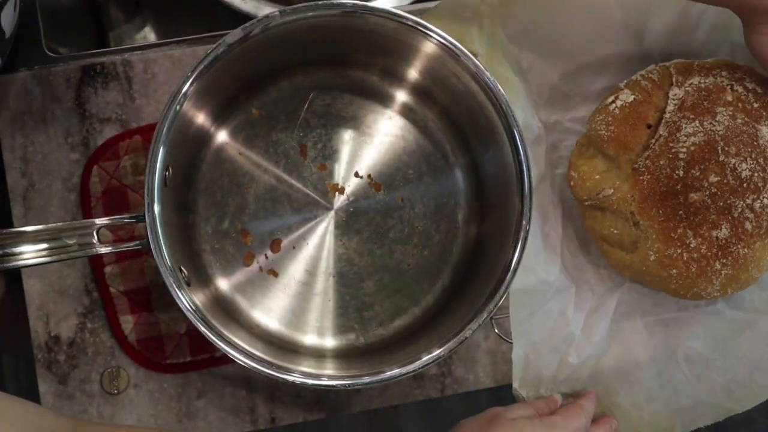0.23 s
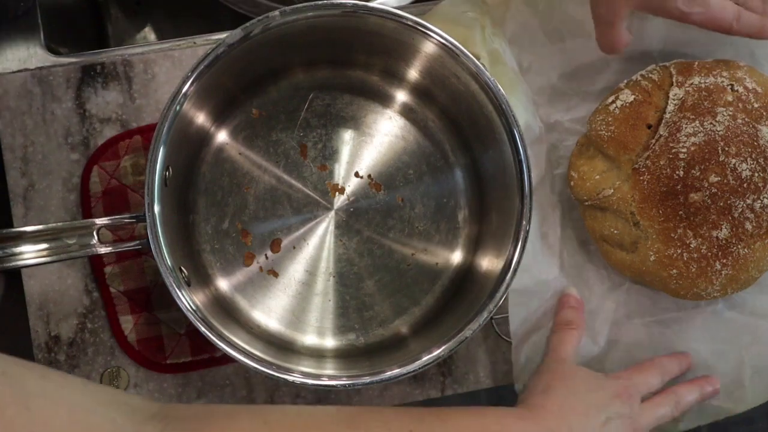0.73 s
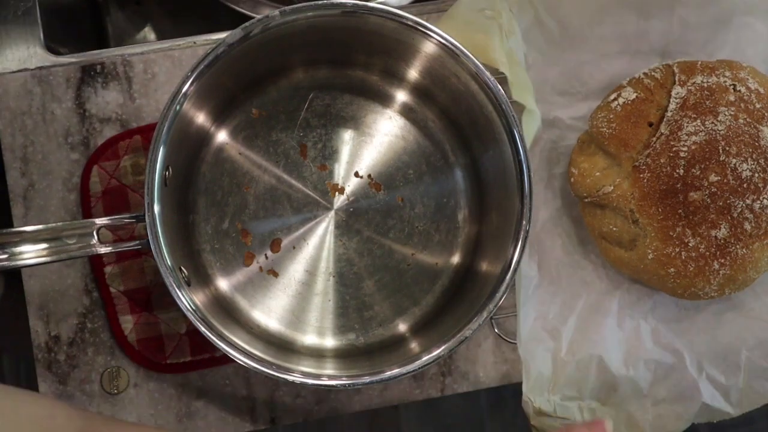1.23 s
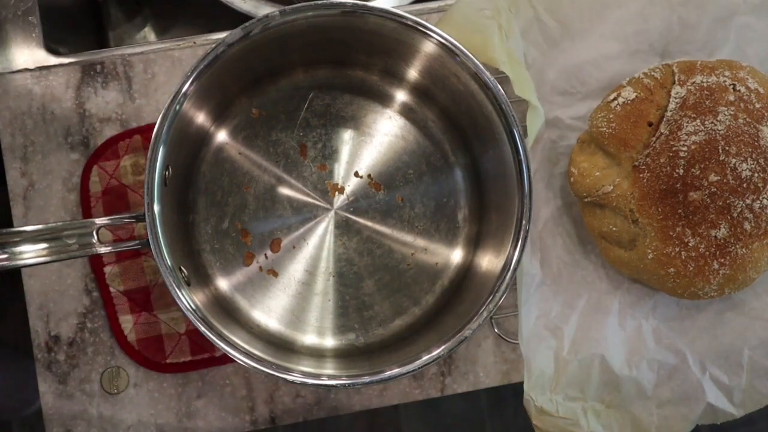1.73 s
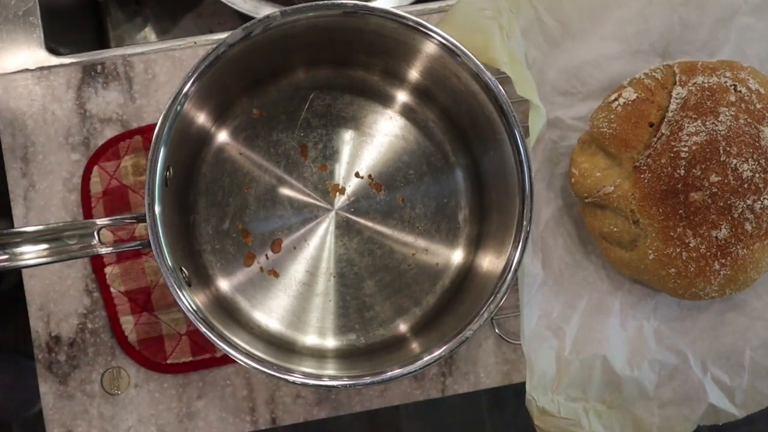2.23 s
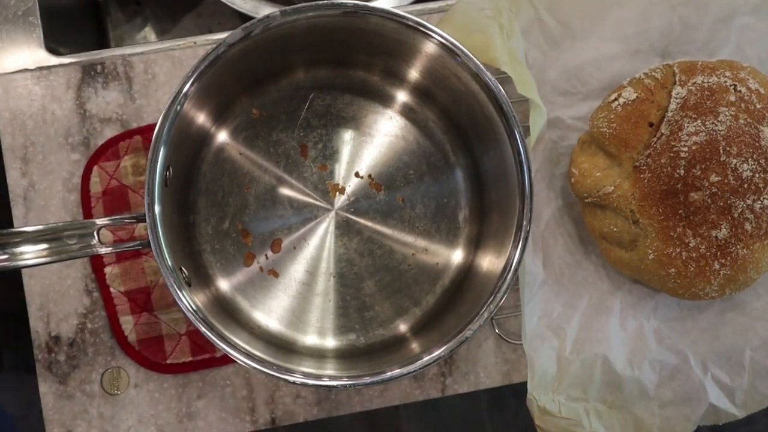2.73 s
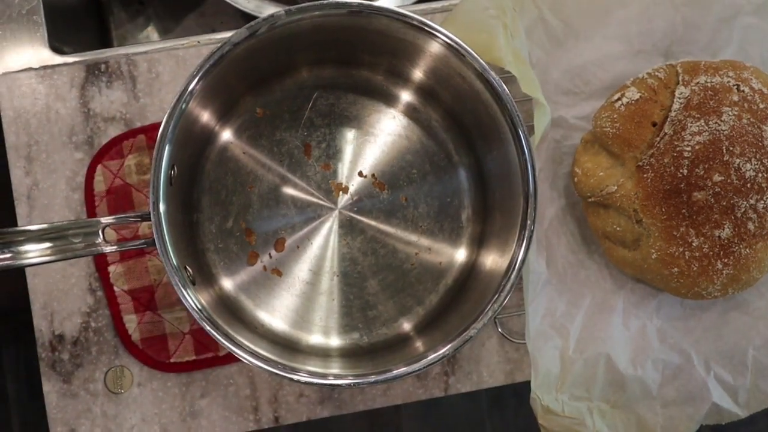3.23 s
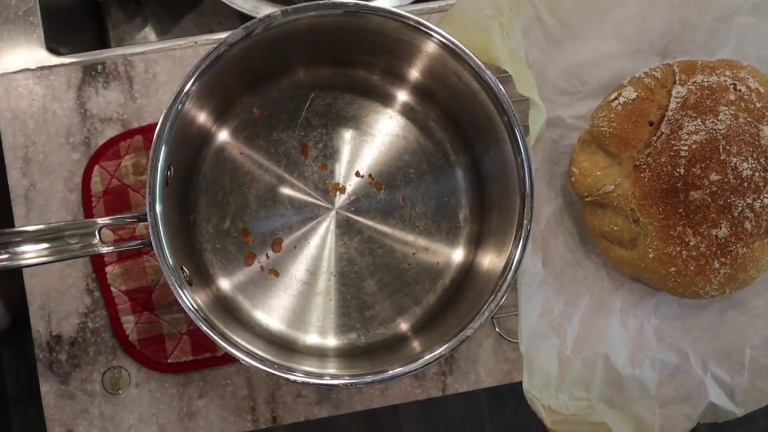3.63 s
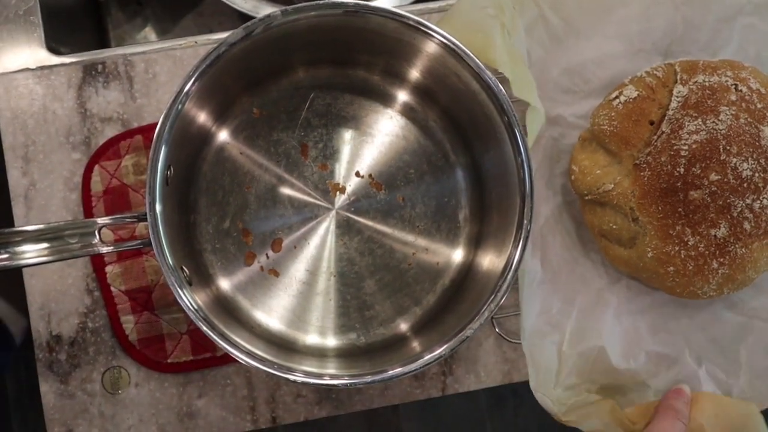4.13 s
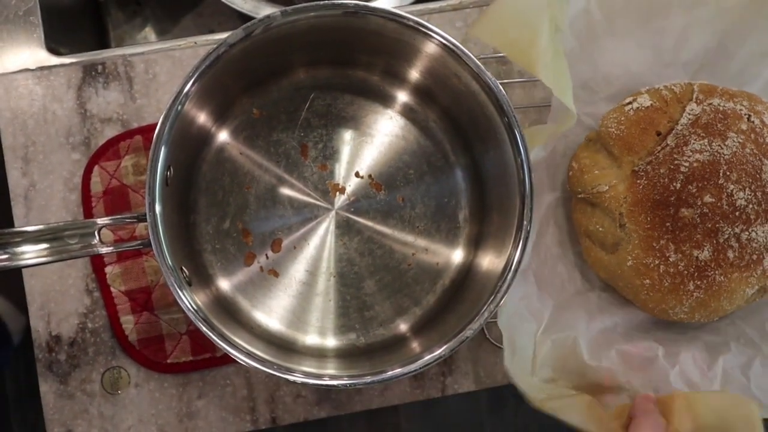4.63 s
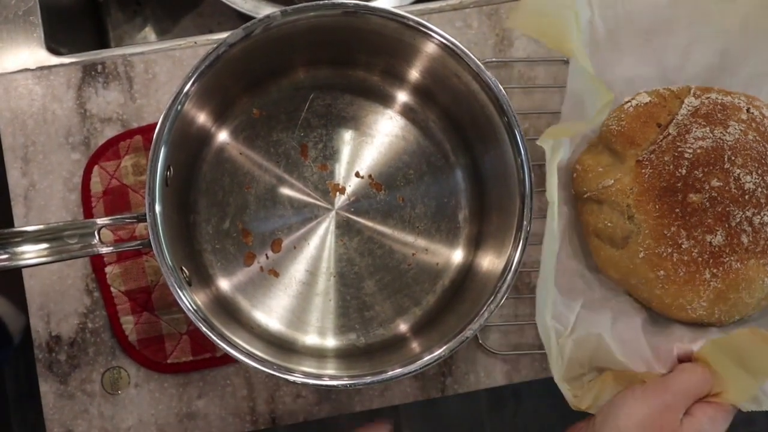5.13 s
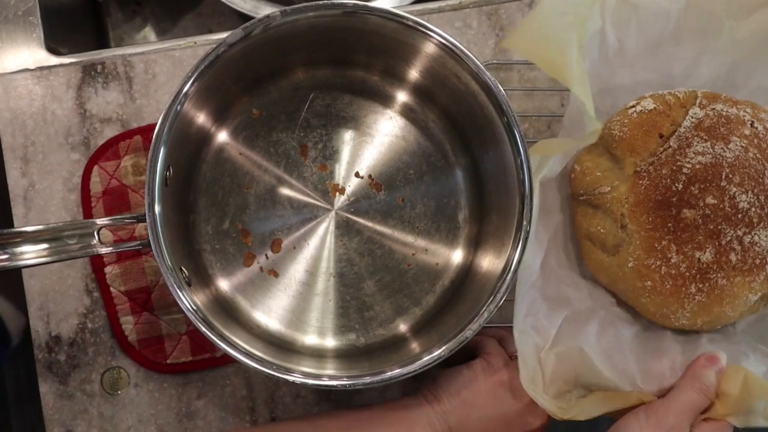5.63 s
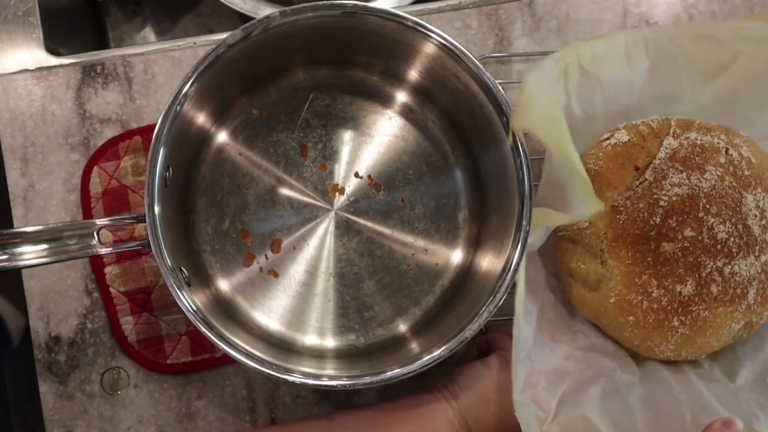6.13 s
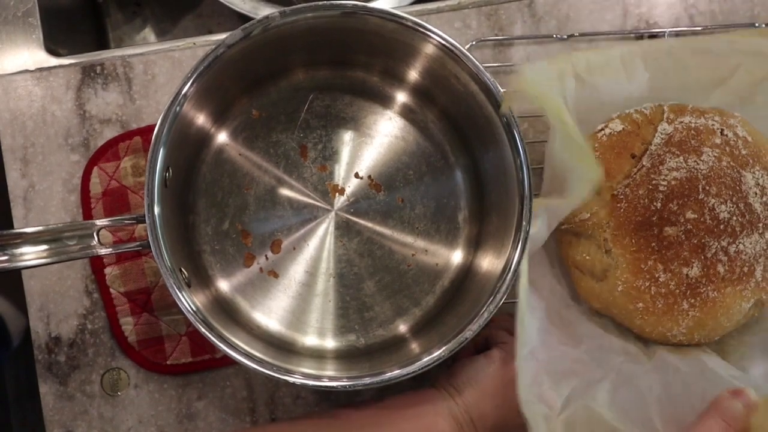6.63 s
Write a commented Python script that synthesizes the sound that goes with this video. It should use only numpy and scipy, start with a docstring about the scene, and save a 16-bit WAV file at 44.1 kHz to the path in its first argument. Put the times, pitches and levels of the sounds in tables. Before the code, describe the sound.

Close, dry stereo sound in a small kitchen, the paper leaning right, with a short bright room tail. From 0 to 1.35 s palms rub parchment: dense crisp crackle at first, with a faint dull knock at the very start, then weaker rustles, and stronger strokes around 0.85 to 1.05 s. From 1.4 to 2.3 s only lone dry ticks remain, with a barely audible settling rustle near 2.2 s. A low 120 Hz appliance hum with dark rushing air swells from 1.4 s and is loudest from 2.7 to 4 s. One hard tick lands at 2.8 s. Faint rustling starts at 3.4 s, growing from 3.9 s into vigorous short pulls, busiest 4.0 to 5.0 s, with sharp creases and hollow flapping. It thins around 5.2 to 5.7 s, then firmer crinkling resumes until 6.89 s, with a soft loaf knock at 6 s.

```python
"""Parchment paper on a wire rack

Small kitchen, two close microphone ports: hands rub, grip and drag a sheet of parchment with a loaf on it. The
sheet crackles in swarms of tiny filtered snaps, with single sharp creases, dry ticks, a soft noise hiss and a
hollow flapping; the loaf knocks the rack, a sum of decaying modes. Behind it an appliance hums in sines and
coloured noise; the background swells while the paper rests and drops at 4 s."""
import sys
import numpy as np
from scipy import signal
from scipy.fft import rfft, irfft
from scipy.io import wavfile
from scipy.ndimage import uniform_filter1d

SR = 44100
rng = np.random.default_rng(int(sys.argv[2]) if len(sys.argv) > 2 else 0)


def to_wav(sig):
    """Store sig (one row per channel, or 1-D mono) as 16-bit WAV at the path in sys.argv[1].

    Samples outside -1..1 are clipped; the rate is SR.
    """
    pcm = np.clip(np.atleast_2d(sig), -1, 1) * 32767
    pcm = np.round(pcm).astype(np.int16)
    wavfile.write(sys.argv[1], SR, pcm.T)  # frames by channels


N = 303849
T = np.arange(N) / SR
FREQS = np.fft.rfftfreq(N, 1 / SR)


def undb(db):
    """Decibels to gain."""
    return np.exp(np.asarray(db) * (np.log(10) / 20))


def unit(x):
    """Scale to rms 1."""
    return x / np.sqrt(np.mean(x ** 2))


def across(points):
    """Join a table's points over log frequency, one value per FFT bin."""
    hz, value = np.transpose(points)
    return np.interp(np.log(FREQS + 1), np.log(hz), value)


def colour(x, points):
    """Causal minimum-phase filter with the given spectrum and unit power gain."""
    log_gain = np.log(unit(undb(across(points))))
    cepstrum = irfft(log_gain, N)
    # folding the cepstrum onto positive time makes the filter causal
    folded = 2 * cepstrum * (np.arange(N) < N // 2)
    response = np.exp(rfft(folded) - cepstrum[0])
    return irfft(rfft(x) * response, N)


def add(track, s, sound):
    """Mix a short sound in at time s."""
    i = max(int(s * SR), 0)
    track[..., i:i + sound.shape[-1]] += sound[..., :N - i]


def walk(rate):
    """Random levels held 1 / rate s and slewed, with rms 1."""
    hold = int(SR / rate)
    steps = rng.standard_normal(N // 32)[np.arange(N) // hold]
    return unit(uniform_filter1d(steps, hold))


# width of diffuse sound at the two ports: pitch_hz, side_minus_mid_db
DIFFUSE_WIDTH = [(110, -22), (200, -18), (380, -11), (700, -8), (1300, -1), (2400, 1), (5000, 2),
                 (14000, 7)]


def diffuse(pair):
    """Mid and side signals become left and right: alike in the bass, wide in the treble."""
    width = undb(across(DIFFUSE_WIDTH))
    gains = np.array([np.ones_like(width), width]) / np.hypot(1, width)
    mid, side = irfft(rfft(pair) * gains, N)
    return np.array([mid + side, mid - side])


# mains hum: pitch_hz, relative_level_db
MAINS_HUM = [(120, 0), (180, -53), (240, -17), (360, -24)]
# faint wavering whines: mean_pitch_hz, relative_level_db before stereo placing
APPLIANCE_WHINES = [(407, -33.5), (459, -29.5), (798, -35.5), (4650, -47)]
# colour of the rushing air: pitch_hz, relative_level_db
AIR_COLOUR = [(20, 10), (35, -7.5), (80, 5), (140, 7.5), (190, -0.5), (235, 3), (300, -6), (460, -8),
              (1000, -12.5), (2000, -19), (5000, -31), (7000, -34.5), (10500, -35), (15000, -65)]
# gain of the whole background over time: time_s, level_db
BACKGROUND_LEVEL = [(0, -27.5), (1.35, -28), (2.7, -20), (4.0, -19), (4.04, -25.5), (4.35, -26.5),
                    (5.1, -32), (5.9, -27.5), (6.89, -27.5)]
# low drone: starting pitch and its steady fall
DRONE_HZ, DRONE_SAG_HZ_PER_S = 59.5, 2.1
# it swells once and fades; peak level relative to the 120 Hz hum, same slope either side
DRONE_PEAK_S, DRONE_DB, DRONE_FADE_DB_PER_S = 1.7, -12.5, 12


def appliance():
    """Mains hum and a sinking drone in the middle, whines and rushing air spread around, under one level curve."""
    hum = sum(undb(db) * np.sin(2 * np.pi * (hz * T + rng.random())) for hz, db in MAINS_HUM)
    drone_hz = DRONE_HZ - DRONE_SAG_HZ_PER_S * T
    drone_db = DRONE_DB - DRONE_FADE_DB_PER_S * np.abs(T - DRONE_PEAK_S)
    drone = undb(drone_db) * np.sin(2 * np.pi * np.cumsum(drone_hz) / SR)
    whine = np.zeros(N)
    for hz, db in APPLIANCE_WHINES:
        wavering_hz = hz + 12 * walk(85)
        whine += undb(db) * np.sin(2 * np.pi * np.cumsum(wavering_hz) / SR)
    air = colour(rng.standard_normal((2, N)), AIR_COLOUR) * undb(-11.0)
    tones = np.sqrt(2) * undb(-5.0) * (hum + drone)
    surround = diffuse(air + np.sqrt(2) * whine)
    level_db = np.interp(T, *np.transpose(BACKGROUND_LEVEL))
    return (tones + surround) * undb(level_db)


# ringing modes of the rack and the counter: pitch_hz, relative_level_db, t60_s
RACK_MODES = [(92, -2, 0.29), (164, 1.5, 0.1), (325, 2, 0.12), (402, 6, 0.091), (488, -10, 0.2)]
# the loaf nudges the rack: start_s, level_db
LOAF_NUDGES = [(0.031, -30.5), (5.988, -29.5)]


def rack():
    """Soft, dull knocks of the loaf: decaying sine modes with a rounded onset."""
    out, t = np.zeros(N), T[:SR // 3]
    knock = sum(undb(db - 60 * t / t60) * np.sin(2 * np.pi * hz * t) for hz, db, t60 in RACK_MODES)
    onset = 1 - np.exp(-t / 0.0024)
    for s, db in LOAF_NUDGES:
        add(out, s, undb(db) * knock * onset)
    return out


# the paper lies to the right, so the left port hears it later: pitch_hz, left_lag_radians
LEFT_LAG = [(100, 0), (700, .2), (1700, .6), (3000, 1.2), (4800, 2), (9000, 2.2), (12500, 3)]
# the sheet is wide, its ends lag more or less than its middle: pitch_hz, lag_either_way_radians
END_LAG = [(200, 0), (1800, .75), (5000, .65), (10000, .4)]
# level difference between the ports: pitch_hz, left_minus_right_db
PORT_BALANCE = [(200, 2.5), (500, -2), (1100, -2.5), (2200, -5), (4500, -2), (8000, -1.2), (12000, 0.5)]
ROOM_BUILD_S = .005  # the reflections take this long to gather


def kitchen(sound, room_db, t60, reach=1):
    """Direct sound leads at the right port; a short decaying noise tail stands for the room's reflections."""
    t = T[:SR // 3]
    tails = rng.standard_normal((2, len(sound), len(t)))
    tails *= undb(-60 * t / t60) * np.clip(t / ROOM_BUILD_S, 0, 1)
    tails /= np.linalg.norm(tails, axis=2, keepdims=True)
    # each part of the sheet (a row of the sound) stirs the room in its own way
    reflections = signal.oaconvolve(sound[None], tails, axes=2).sum(1)[:, :N]
    wet = diffuse(reflections)
    ports = np.array([[.5], [-.5]])
    lag, spread = across(LEFT_LAG), across(END_LAG)
    direct = 0
    for part, place in zip(sound, np.linspace(-reach, reach, len(sound))):
        direct = direct + rfft(part) * np.exp(-1j * ports * (lag + place * spread))
    both = direct + undb(room_db) * rfft(wet)
    return irfft(both * undb(ports * across(PORT_BALANCE)), N)


# snaps centred at either of these pitches click broadly; those between ring more narrowly,
# most of all near 1640 Hz; beyond them the click is broader still
HIGH_BROAD_HZ, LOW_BROAD_HZ, RING_POWER = 4500, 600, 1.5


def snaps(hz, flutter, flutter_s, travel_s, size=256):
    """Patches of paper flip, one row each: a sharp edge and a noise flutter in the patch's own resonance."""
    t, f = T[:size], np.fft.rfftfreq(size, 1 / SR) + 1
    centre = hz[:, None]
    shiver = rng.standard_normal((len(hz), size)) * np.exp(-t / flutter_s) / np.sqrt(flutter_s * SR / 2)
    # bending waves carry the treble faster than the lows; travel_s is the delay at the centre pitch
    edge = np.exp(-4j * np.pi * travel_s * np.sqrt(f * centre))
    ratio = f / centre
    sharpness = np.minimum(HIGH_BROAD_HZ / centre, centre / LOW_BROAD_HZ) ** RING_POWER
    resonance = 1 + 1j * sharpness * (ratio - 1 / ratio)
    rung = irfft((edge + flutter * rfft(shiver)) / resonance)
    return rung / np.linalg.norm(rung, axis=1, keepdims=True)


# lone dry ticks while the sheet rests: start_s, edge_level_db, ring_pitch_hz, ring_level_db
# (levels of unit-energy sounds before colouring)
RESTING_TICKS = [(1.4144, -16, 3000, -21), (1.4397, -6, 1580, -8.5), (1.568, -24.5, 2390, -19),
                 (1.5975, -6.5, 3300, -12.5), (1.679, -25, 2440, -21.5), (1.755, -20, 3860, -29),
                 (1.9622, -17.5, 4000, -36), (2.0165, -15.5, 3500, -20), (2.1358, -7.5, 1510, -27),
                 (2.2802, -8, 2620, -10), (2.807, 8, 1370, -8)]
# colour of the ticks: pitch_hz, relative_level_db
TICK_COLOUR = [(600, -22), (1300, -2), (2700, 0), (4300, 1.5), (6000, -1.5), (9800, 0), (11000, 4.5),
               (12200, -8), (16000, -20)]
# shiver strength against the edge and its decay time; decay time of the ring in cycles
TICK_SHIVER, TICK_SHIVER_S, TICK_RING_CYCLES = .45, .002, 1.2
# travel time of the edge through the sheet, at the pitch beside it
TICK_TRAVEL_S, TICK_TRAVEL_HZ = .0005, 4500


def ticks():
    """A clean, bright edge with a brief shiver, and a short sine ring of the patch that flipped."""
    out, t = np.zeros(N), T[:SR // 50]
    # bending waves bring the treble a moment before the lows
    f = np.fft.rfftfreq(len(t), 1 / SR)
    bend = irfft(np.exp(-4j * np.pi * TICK_TRAVEL_S * np.sqrt(f * TICK_TRAVEL_HZ)), len(t))
    fade = np.exp(-t / TICK_SHIVER_S) / np.sqrt(TICK_SHIVER_S * SR / 2)
    for s, db, hz, ring_db in RESTING_TICKS:
        edge = bend + TICK_SHIVER * rng.standard_normal(len(t)) * fade
        ring = np.sin(2 * np.pi * hz * t) * np.exp(-t * hz / TICK_RING_CYCLES)
        edge /= np.linalg.norm(edge)
        ring /= np.linalg.norm(ring)
        add(out, s, undb(db) * edge + undb(ring_db) * ring)
    return kitchen(colour(out, TICK_COLOUR)[None], room_db=-1, t60=0.23)


# single creases snapping through: start_s, relative_level_db, centre_pitch_hz
SINGLE_CREASES = [(0.0162, -17, 8300), (0.0346, -19.5, 8840), (0.0445, -22, 8060), (0.0984, -28, 7885),
                  (0.127, -15, 5500), (0.288, -16.5, 6530), (0.348, -25, 6500), (0.3949, -39, 7000),
                  (0.401, -27, 4530), (0.486, -31, 4510), (0.589, -26, 4540), (0.707, -37, 6530),
                  (0.7561, -32, 5030), (0.7795, -21.5, 5670), (0.8298, -18, 6700), (0.8551, -28, 5503),
                  (0.8757, -22, 4793), (0.919, -16.5, 4800), (1.005, -20, 4830), (1.029, -12.5, 4680),
                  (1.036, -11.5, 6377), (1.0813, -28, 7160), (1.1803, -28, 7164), (1.215, -22, 3307),
                  (1.244, -23, 4800), (1.249, -21, 7100), (1.2862, -30, 5700), (1.3254, -25, 4290),
                  (1.3414, -26.5, 7300), (3.4367, -36.5, 3620), (3.6428, -34, 8150), (3.65, -33, 6480),
                  (3.687, -43, 6000), (3.699, -34, 4214), (3.787, -39, 2810), (3.8102, -29, 6250),
                  (3.8578, -16.5, 5540), (3.8692, -29, 6390), (3.889, -14, 6480), (3.8971, -19, 5726),
                  (3.9586, -27, 6020), (3.9669, -20.5, 3750), (3.9975, -20, 6660), (4.0075, -11, 9100),
                  (4.0216, -17.5, 5400), (4.028, -12, 5890), (4.038, -22, 7600), (4.068, -9, 6830),
                  (4.0786, -15, 8870), (4.1257, -16, 6260), (4.2024, -19, 6610), (4.2803, -18, 6930),
                  (4.2908, -12.5, 5800), (4.301, -18, 5596), (4.3505, -13, 5480), (4.3878, -18, 5834),
                  (4.4201, -11.5, 6186), (4.4523, -25, 6120), (4.486, -20, 4440), (4.501, -14.5, 5054),
                  (4.509, -17.5, 4980), (4.52, -24, 6080), (4.5482, -21, 6100), (4.591, -23.5, 5120),
                  (4.63, -20, 7200), (4.6356, -19, 6120), (4.652, -17, 6510), (4.6609, -13, 6190),
                  (4.6834, -19, 7785), (4.7197, -12, 5535), (4.736, -17.5, 5450), (4.765, -26, 5616),
                  (4.777, -21, 3200), (4.7865, -14, 5300), (4.7981, -13, 6336), (4.8453, -12, 7060),
                  (4.8618, -24, 2631), (4.9254, -14.5, 6470), (5.0189, -19, 6127), (5.0263, -15.5, 6316),
                  (5.0712, -20, 5700), (5.1133, -22, 4630), (5.1309, -18.5, 4605), (5.1324, -25, 4857),
                  (5.1614, -21, 6640), (5.269, -32, 3780), (5.338, -30, 4840), (5.341, -37, 1520),
                  (5.385, -19, 5990), (5.4129, -21.5, 5730), (5.526, -21.5, 7800), (5.553, -24, 5370),
                  (5.5616, -28, 4970), (5.6178, -22.5, 4255), (5.6212, -24.5, 4170), (5.6338, -28.5, 3202),
                  (5.6605, -25.5, 3097), (5.7003, -23, 4676), (5.734, -27, 4186), (5.7731, -21.5, 4183),
                  (5.835, -28, 6196), (5.9549, -16, 6130), (5.9935, -18.5, 6360), (6.026, -22, 5395),
                  (6.1116, -24, 6000), (6.1893, -23.5, 3195), (6.2372, -24, 6830), (6.2627, -23, 5510),
                  (6.2982, -19.5, 4317), (6.4163, -22.5, 6206), (6.5507, -16.5, 6480), (6.6753, -22, 6770),
                  (6.7575, -16, 6310), (6.8273, -23, 3810)]
# colour of the creases: pitch_hz, relative_level_db
CREASE_COLOUR = [(300, -30), (800, 5), (1300, 6.5), (2200, 3), (4000, 5.5), (6000, 1.5), (10400, 9.5),
                 (12000, 6), (14000, -15), (16000, -51)]
# flutter of a fold as it gives way: strength against the first edge, decay time
CREASE_FLUTTER, CREASE_FLUTTER_S = 1.1, .0015
CREASE_REACH = .45  # the stiff folds lie near the middle: share of the sheet's width


def creases(channels=3):
    """Stiff folds give way one at a time, each a resonant snap at its own pitch and place on the sheet."""
    out = np.zeros((channels, N))
    times, levels, centres = np.transpose(SINGLE_CREASES)
    places = rng.integers(channels, size=len(times))
    folds = snaps(centres, flutter=CREASE_FLUTTER, flutter_s=CREASE_FLUTTER_S, travel_s=0.000391)
    for s, db, place, fold in zip(times, levels, places, folds):
        add(out[place], s, undb(db + 23.5) * fold)
    return kitchen(colour(out, CREASE_COLOUR), room_db=-2.0, t60=0.19, reach=CREASE_REACH)


def movement(start, length, attack_s, release_db_per_s):
    """Gain of one movement of the sheet: it builds up, holds, then dies away."""
    build = np.clip((T - start) / attack_s, 0, 1)
    since_end_s = np.clip(T - start - length, 0, 2)
    return build * undb(-release_db_per_s * since_end_s)


# flutter of the tiny snaps: strength against the edge, decay time
FACET_FLUTTER, FACET_FLUTTER_S = 1.2, .001
HARDEST_SNAP = 2.2  # the hardest snap lies at most this many spreads above the softest


def swarm(per_s, spread_db, bunching_db, low_hz, high_hz, count=20000, channels=4):
    """Facets buckle at random in little avalanches, mostly softly, now and then hard; one row a quarter sheet."""
    when, pitch, force, sign, place = rng.random((count, 5)).T
    # exponential waits against a wandering rate give the start samples
    due = np.cumsum(per_s * undb(bunching_db * walk(55))) / SR
    start = np.searchsorted(due, np.cumsum(-np.log(when)))
    hardness = np.minimum(-np.log(force), HARDEST_SNAP)
    size = undb(spread_db * hardness) * np.sign(sign - .5)
    hz = low_hz * (high_hz / low_hz) ** pitch[start < N]
    grains = snaps(hz, flutter=FACET_FLUTTER, flutter_s=FACET_FLUTTER_S, travel_s=0.000304)
    out = np.zeros((channels, N))
    for i, grain, gain, row in zip(start, grains, size, place * channels):
        add(out[int(row)], i / SR, gain * grain)
    # the hand feeds energy in steadily, however it is shared among the snaps
    power = uniform_filter1d(np.mean(out ** 2, 0), SR // 20)
    return out / np.sqrt(power + 1e-9)


# palms rub the sheet flat: start_s, length_s, crackle_level_db before the common trim
PALM_RUBS = [(0.0, 0.27, -16.5), (0.336, 0.11, -28), (0.437, 0.16, -23), (0.669, 0.097, -30),
             (0.783, 0.061, -25), (0.83, 0.12, -15), (0.991, .075, -16), (1.102, 0.07, -24.5),
             (1.213, 0.025, -21), (1.271, 0.081, -31)]
# fingers drag the loaf along in short pulls: start_s, length_s, crackle_level_db, flap_relative_db
# (both levels before the common trims)
EDGE_PULLS = [(3.408, 0.079, -40, -21), (3.5, 0.12, -43, -20), (3.635, 0.033, -33.5, -14),
              (3.68, .17, -36.5, -7), (3.886, 0.036, -28, -6.5), (3.954, 0.15, -24.5, -8.5),
              (4.094, 0.13, -19, -13.5), (4.244, .2, -22, -10), (4.486, 0.1, -26, -7.5),
              (4.625, 0.18, -17.5, -12), (4.832, 0.072, -24, -12.5), (4.905, 0.125, -18.5, -13),
              (5.045, 0.036, -29, -6.5), (5.124, 0.044, -28, -10), (5.192, 0.23, -35.5, -7.5),
              (5.416, 0.049, -25.5, -11.5), (5.528, 0.043, -29, -11.5), (5.619, 0.042, -28, -12),
              (5.698, 0.093, -28, -8), (5.792, .1, -20.5, -10.5), (5.941, 0.048, -19, -9.5),
              (6.022, 0.24, -26, -9), (6.078, 0.037, -21.5, -15), (6.216, 0.18, -25, -10.5),
              (6.384, 0.13, -24.5, -10), (6.542, 0.093, -21.5, -9.5), (6.663, 0.048, -19, -9.5),
              (6.723, 0.16, -21.5, -10)]
# the sheet glides instead of folding, with a finer grain: start_s, length_s
SHEET_GLIDES = [(3.4, .42), (5.79, 1.3)]
# colour of the crackle: pitch_hz, relative_level_db
CRACKLE_COLOUR = [(300, -69.5), (800, 0.5), (1500, -7), (2500, -0.5), (4200, 2), (5800, 2), (8000, 3),
                  (10400, 6.5), (11500, 5), (12500, -18), (14000, -15), (16000, -64)]
# colour of the flapping sheet: pitch_hz, relative_level_db
FLAP_COLOUR = [(100, -1.5), (250, 0), (430, 1), (600, -2.5), (900, 1), (1300, 3), (2000, 6), (4000, -9.5)]
# each movement takes hold quickly and dies away once the hand stops
RUB_ATTACK_S, RUB_RELEASE_DB_PER_S, RUB_FLAP_DB = .03, 220, -13
PULL_ATTACK_S, PULL_RELEASE_DB_PER_S = .022, 220
# the sheet relaxes after being let go
SETTLE_S, SETTLE_LENGTH_S, SETTLE_DB = 2.06, 0.32, -44
SETTLE_ATTACK_S, SETTLE_RELEASE_DB_PER_S = 0.25, 115
# rubbing palms keep many patches busy; a pulled sheet buckles in fewer, more of them the harder it is pulled
# (nominal rates that add up, before bunching)
RUB_SNAPS_PER_S, PULL_SNAPS_PER_S, IDLE_SNAPS_PER_S, GLIDE_SNAPS_PER_S = 1300, 550, 330, 1100
FIRM_PULL_DB = -19  # a pull at this level adds the full pull rate
# sliding hiss under the snaps, and how unequal the snaps are
SLIDE_DB, SNAP_SPREAD_DB = -22, 7
RUSTLE_ROOM_DB, RUSTLE_T60_S = -3.5, .2


def rustle():
    """Swarms of snaps and sliding noise follow the hands; lower swarms give the broad sheet's hollow flapping."""
    rubs = np.array([undb(db) * movement(s, length, RUB_ATTACK_S, RUB_RELEASE_DB_PER_S)
                     for s, length, db in PALM_RUBS])
    pulls = np.array([undb(db) * movement(s, length, PULL_ATTACK_S, PULL_RELEASE_DB_PER_S)
                      for s, length, db, _ in EDGE_PULLS])
    rubbing, pulling = np.linalg.norm(rubs, axis=0), np.linalg.norm(pulls, axis=0)
    settling = undb(SETTLE_DB) * movement(SETTLE_S, SETTLE_LENGTH_S, SETTLE_ATTACK_S, SETTLE_RELEASE_DB_PER_S)
    gliding = sum(movement(s, length, PULL_ATTACK_S, PULL_RELEASE_DB_PER_S) for s, length in SHEET_GLIDES)
    pull_flap = undb([row[3] for row in EDGE_PULLS])[:, None]
    flapping = undb(RUB_FLAP_DB) * rubbing + np.linalg.norm(pulls * pull_flap, axis=0)

    per_s = IDLE_SNAPS_PER_S + RUB_SNAPS_PER_S * np.sqrt(rubbing / rubbing.max())
    per_s = per_s + PULL_SNAPS_PER_S * pulling / undb(FIRM_PULL_DB) + GLIDE_SNAPS_PER_S * gliding
    buckling = swarm(per_s, spread_db=SNAP_SPREAD_DB, bunching_db=5, low_hz=1850, high_hz=12860)
    slide = undb(SLIDE_DB + 1.5 * walk(29)) * rng.standard_normal(buckling.shape)
    crackle = unit(colour(buckling + slide, CRACKLE_COLOUR)) * undb(-8.0) * (rubbing + pulling + settling)

    flap_swarm = swarm(per_s=700, spread_db=4.0, bunching_db=3, low_hz=356, high_hz=1604)
    flap = undb(-6.5) * flapping * unit(colour(flap_swarm, FLAP_COLOUR))
    # the paper catches and slips, so no movement is quite even
    catching = undb(1.0 * walk(70))
    return kitchen(catching * (crackle + flap), room_db=RUSTLE_ROOM_DB, t60=RUSTLE_T60_S)


def scene():
    """Paper and rack over the hum of the kitchen."""
    return appliance() + rack() + ticks() + creases() + rustle()


TOP_HZ, CEILING = 15700, .85  # edge of the low-pass; full scale is 1


def record(dry):
    """The recorder clips whatever exceeds its ceiling, then a steep low-pass cuts the top."""
    clipped = np.clip(dry, -CEILING, CEILING)
    low_pass = signal.ellip(8, .2, 70, TOP_HZ, fs=SR, output="sos")
    return signal.sosfilt(low_pass, clipped)


dry = scene()
out = record(dry)
to_wav(out)
```